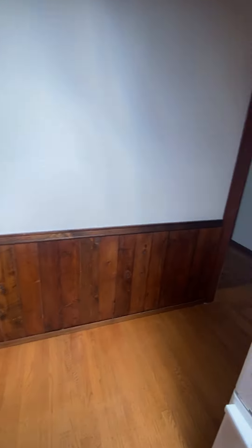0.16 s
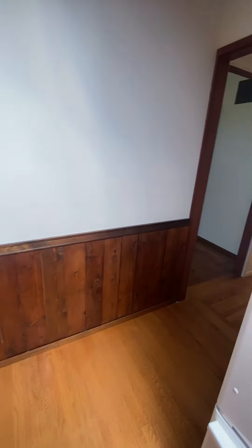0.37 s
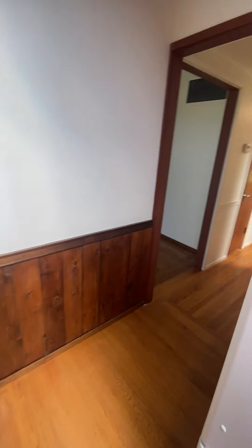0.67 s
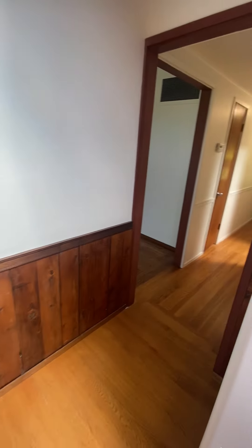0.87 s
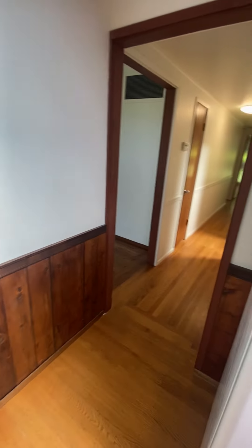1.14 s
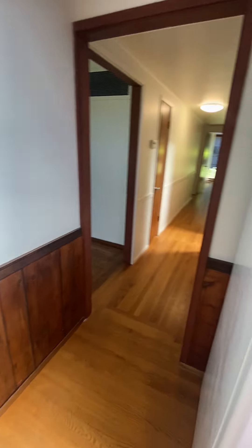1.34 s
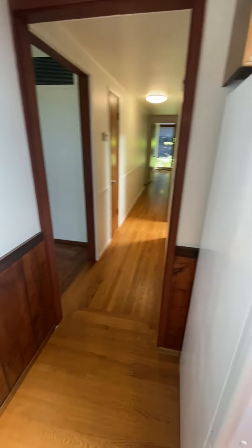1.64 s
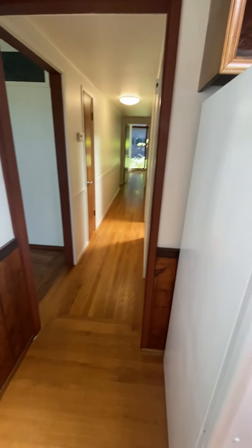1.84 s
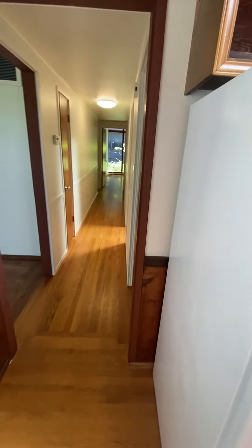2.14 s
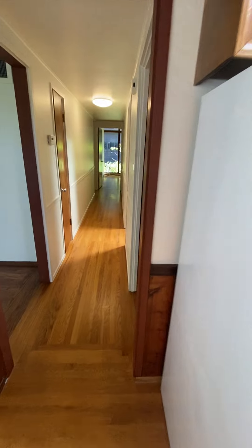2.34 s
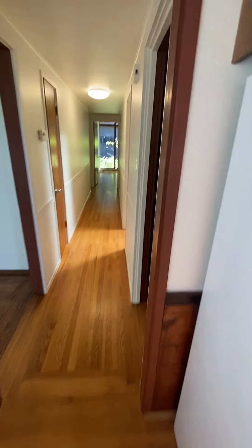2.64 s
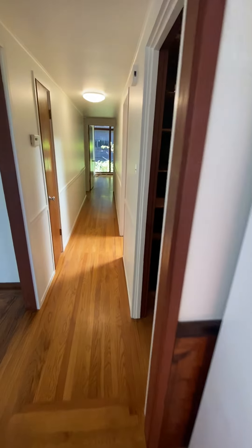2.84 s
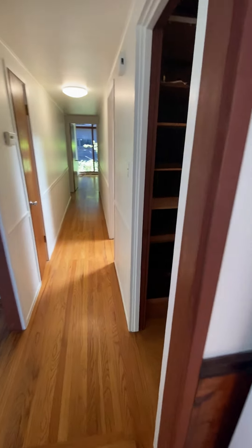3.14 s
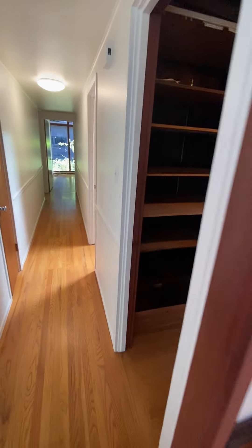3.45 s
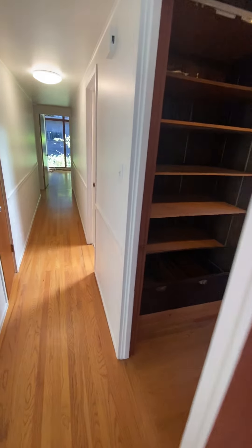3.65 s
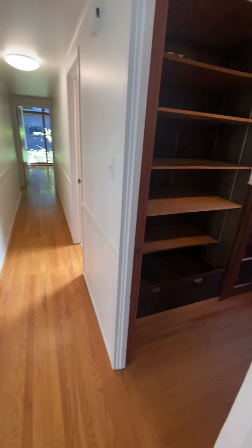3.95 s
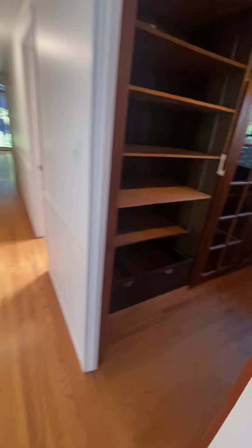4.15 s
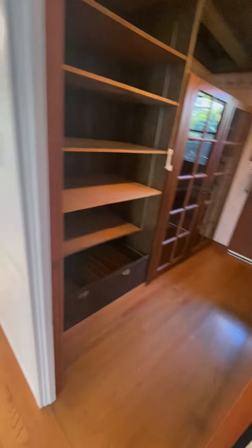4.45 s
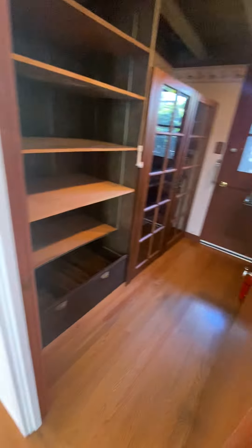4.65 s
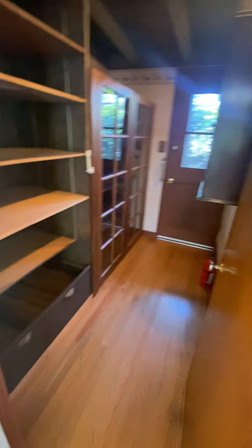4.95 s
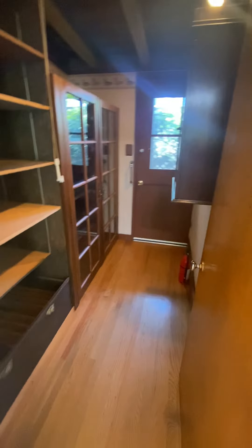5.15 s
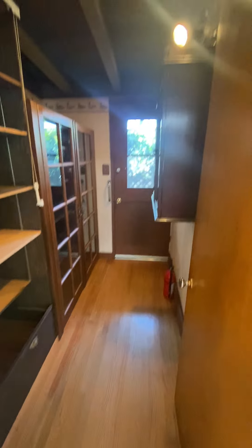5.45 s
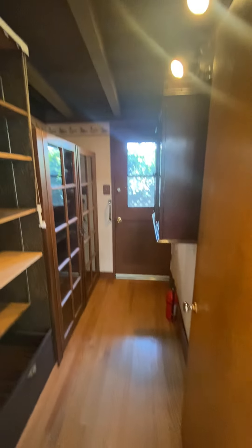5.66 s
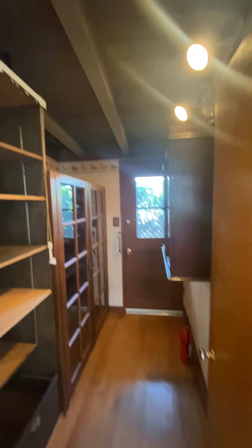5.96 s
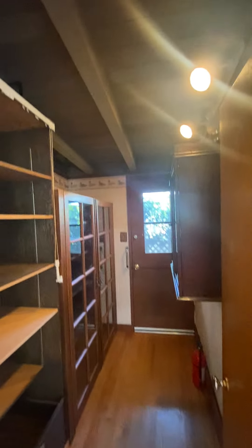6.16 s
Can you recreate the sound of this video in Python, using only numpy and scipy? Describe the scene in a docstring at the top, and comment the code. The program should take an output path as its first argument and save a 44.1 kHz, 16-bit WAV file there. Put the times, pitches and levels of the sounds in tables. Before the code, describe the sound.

A handheld phone hears someone in shoes walking through bare, echoing rooms with hardwood floors, over very faint hiss and a wavering low floor rumble. Weak, deep thumps come at 0.2 and 0.4 seconds, then the loudest step, a bright hard crack at 0.54, rings out with a flutter echo near 0.74 and a short scuff. A solid heel knock lands at 1.36, followed by a swelling, gritty, thinly whistling scrape from about 1.55 to 1.9. Softer steps and a scuff come at 2.3 to 2.7, with dry ticks close by until 3. A duller, booming heel falls at 3.2, with smaller knocks just after. Another comes near 3.97, trailed by a cluster of taps and snaps until 4.4. A fuller double knock sounds at 4.95, then light scuffing and ticks. A final firm heel and snap at 5.7 and a softer one at 5.8 die away by 6.3.

```python
"""Someone walks in shoes over a hardwood floor through bare rooms, a phone in the hand.
From the start a faint hiss and a wavering low floor tone in rumble: slowly varied noise and a sine.
From 0.2 s heels knock and drum the boards and soles snap: noise bursts and damped modes in an echoing room.
From 0.5 s soles scuff in swelling, gritty noise with thin whistles; at 0.74 s a loud crack flutters back;
from 1.3 s small things tick close by as clusters of short sines. The last heel falls at 5.8 s."""
import sys
import numpy as np
from scipy.fft import rfft, irfft, next_fast_len
from scipy.io import wavfile
from scipy.ndimage import map_coordinates

SR = 44100
rng = np.random.default_rng(int(sys.argv[2]) if len(sys.argv) > 2 else 0)


def materialize(psi):
    """Save the field psi as 16-bit PCM at rate SR to the path in sys.argv[1].

    A 1-D psi becomes a single channel; in a 2-D psi each row is a channel.
    """
    bounded = np.clip(np.atleast_2d(psi).T, -1, 1)
    quanta = np.round(bounded * 32767).astype(np.int16)
    wavfile.write(sys.argv[1], SR, quanta)


N = 278271
BLOW_SAMPLES = 2 ** 15


def amp(db):
    """Decibels to gain."""
    return 10 ** (np.asarray(db) / 20)


def unit(x):
    """Scaled to rms 1."""
    return x / np.sqrt(np.mean(x ** 2) + 1e-20)


def along(points, hz):
    """Interpolates (frequency [Hz], value) points on a log frequency axis."""
    f, v = np.transpose(points)
    return np.interp(np.log(hz + 1), np.log(f + 1), v)


def colour(*spectra):
    """Gain over frequency of (frequency [Hz], level [dB]) spectra in series."""
    return lambda hz: amp(sum(along(s, hz) for s in spectra))


def wobble(knots_per_s):
    """A smooth random curve through normally distributed knots."""
    knots = rng.standard_normal(int(N * knots_per_s / SR) + 4)
    return map_coordinates(knots, [np.arange(N) * knots_per_s / SR])


def noise_spectrum(size, gain, likeness, ripple_db=0):
    """Spectrum of stereo noise of rms 1, left-right correlation per table; ripple = the room's fine peaks."""
    hz = np.fft.rfftfreq(size, 1 / SR)
    turn = np.arccos(np.clip(along(likeness, hz), -1, 1)) / 2
    mid, side = rfft(rng.standard_normal((2, size))) * [np.cos(turn), np.sin(turn)]
    knots = rng.standard_normal(SR // 20)
    ripple = amp(ripple_db * map_coordinates(knots, [hz / 30]))  # a knot every 30 Hz
    g = gain(hz) * ripple
    return np.array([mid + side, mid - side]) * g / np.sqrt(np.mean(g ** 2))


def steady_noise(gain, likeness, ripple_db=0):
    """Steady stereo noise of a given colour."""
    size = next_fast_len(N)
    return irfft(noise_spectrum(size, gain, likeness, ripple_db), size)[:, :N]


def add(out, start_s, sound, pan_db):
    """Places a sound at a time; positive pan makes the left louder."""
    part = out[:, round(start_s * SR):][:, :sound.shape[-1]]
    part += (sound * amp([[pan_db / 2], [-pan_db / 2]]))[:, :part.shape[1]]


# hiss colour: (frequency [Hz], relative level [dB])
HISS_COLOUR = [(71, -26), (120, -7.5), (173, -17), (313, -5), (401, -20), (535, -4), (635, -18.5),
               (1050, -18.5), (1290, -23.5), (3700, -29.5), (4940, -28), (8440, -34), (11700, -46.5),
               (15200, -62), (22000, -120)]
# hiss at the two ports: (frequency [Hz], nominal left-right correlation, clipped to -1..1 [1])
HISS_LIKENESS = [(60, 0.67), (170, 0.78), (490, -1.1), (1390, -0.38), (3950, -0.43), (11200, 0.9)]


def quiet():
    """Faint stereo noise, its level slowly wandering about a mean."""
    mean_db, wander_db = -75, 0.98
    return amp(mean_db + wander_db * wobble(5.1)) * steady_noise(colour(HISS_COLOUR), HISS_LIKENESS)


# joist sway under the weight: (time [s], nominal level [dB])
SWAY_LEVEL = [(0.0, -89), (0.26, -88), (0.46, -53), (1.03, -69.5), (1.261, -65.5), (1.54, -60), (2.28, -60),
              (2.62, -57.5), (2.73, -52.5), (2.84, -62.5), (3.37, -53.5), (3.55, -53.5), (3.81, -64.5),
              (4.13, -55.5), (4.66, -67.5), (5.24, -61.5), (5.5, -70.5), (6.31, -70)]
# rumble colour: (frequency [Hz], relative level [dB])
SWAY_COLOUR = [(15, -45), (25, -19.5), (40, -1.5), (59, -1.5), (73, -3), (91, -22.5), (129, -11),
               (250, -31), (320, -59.5), (550, -120)]
# diffuse sound at the two ports, all noise but the hiss: (frequency [Hz], left-right correlation [1])
LIKENESS = [(60, 0.87), (130, 0.44), (270, 1), (570, 0.051), (1190, -0.011), (2520, -0.22), (3800, -0.43),
            (5320, 0.12), (11200, 0.028)]


def joists():
    """The floor sways as the weight shifts: a low tone, wavering in pitch and level, in rumble."""
    mean_hz = 59.3
    pitch_hz = mean_hz * (1 + 0.061 * wobble(16))
    tone = amp(4.4 * wobble(20)) * np.sin(2 * np.pi * np.cumsum(pitch_hz) / SR)
    rumble = 1.01 * steady_noise(colour(SWAY_COLOUR), LIKENESS)
    level_db = np.interp(np.arange(N) / SR, *np.transpose(SWAY_LEVEL))
    return amp(level_db) * (tone + rumble)


# bare room by octave: (centre [Hz], full ring t60 [s], build-up time constant [s])
ROOM = [(219.5, 0.62, 0.0023), (430, 0.6, 0.0038), (890, 0.59, 0.0013), (1830, 0.62, 0.00045),
        (3740, 0.76, 0.0018), (6970, 0.57, 0.0021), (11960, .3, 0.00091)]


def blow(spectrum, ring_share, direct_db):
    """Room response: bands build up and die at their own speeds, over a brief direct sound alike at both ports."""
    hz, t = np.fft.rfftfreq(BLOW_SAMPLES, 1 / SR), np.arange(BLOW_SAMPLES) / SR
    centres, t60_s, rise_s = (c[:, None] for c in np.transpose(ROOM))
    log_hz, log_centres = np.log(hz + 1), np.log(centres[:, 0])
    shares = np.array([np.interp(log_hz, log_centres, row) for row in np.eye(len(ROOM))])
    build_up = (1 - np.exp(-t / rise_s)) ** 2
    bands = irfft(shares[:, None] * spectrum, BLOW_SAMPLES) * build_up[:, None]
    direct_t60_s = 0.005 + 8 * rise_s
    direct = (bands[:, 0] * amp(direct_db - 60 * t / direct_t60_s)).sum(axis=0)
    echoes = amp(1.26 * map_coordinates(rng.standard_normal(80), [t * 70]))  # walls answer in clumps
    decay = amp(-60 * t / (ring_share * t60_s))
    return direct + echoes * (bands * decay[:, None]).sum(axis=0)


def ringing(modes, ring_share, rise_s):
    """Damped modes that swell in, at new strengths, phases and slightly new pitches for every blow."""
    t = np.arange(BLOW_SAMPLES) / SR
    total = 0
    draws = rng.standard_normal((len(modes), 3))
    for (hz, db, t60_s), (strength, detune, phase) in zip(modes, draws):
        decay = amp(db + 2.5 * strength - 60 * t / (ring_share * t60_s))
        total = total + decay * np.sin(2 * np.pi * hz * (1 + 0.026 * detune) * t + phase)
    return (1 - np.exp(-t / rise_s)) ** 2 * total


# footfalls: (time [s], overall gain [dB], nominal boom [Hz], joist boom gain [dB], panel drum gain [dB],
# knock tilt at 800 Hz [dB], knock tilt from 1.8 kHz up [dB])
HEELS = [(0.196, -68.5, 97, 22, 19, 14, 5), (0.234, -68, 62.6, 30, 21.5, -31, -8),
         (0.39, -51.5, 107.6, 9.5, 6.5, -8, 0), (0.429, -58.5, 54.3, 18, 5, -27, 6.5),
         (0.541, -32, 105, -12, -14.5, -0.5, 10), (0.81, -63.5, 50.9, 19, -0.5, -12, 10),
         (1.360, -34, 75.2, 2.5, -1.5, 0, -4), (1.529, -56.5, 56.8, 17.5, 4, -2, -26),
         (2.371, -52, 67.2, 18.5, 6.5, -15, -10), (2.486, -47, 76.3, 6.5, 3, -0.5, 4),
         (2.70, -65.5, 55.6, 31, -19, -3, 12), (3.219, -35.5, 88.7, 6.5, -9.5, -3.5, -35.5),
         (3.304, -48.5, 70.5, 20.5, 10, -9.5, -2.5), (3.348, -49.5, 65.3, 18, 10, -4, 14.5),
         (3.549, -63, 64.7, 14, -6.5, -9.5, 11), (3.771, -74.5, 65.7, 22, -4, -13, 0.5),
         (3.966, -41.5, 88.6, 2.5, -4, -3.5, -31.5), (4.048, -54.5, 78, 13.5, -5, -12, -20),
         (4.109, -54.5, 70.6, 5, 8.5, -6, 1.5), (4.193, -50, 78, 1, -12, 2.5, 17.5),
         (4.408, -50, 77, 0, -4.5, -5.5, -2), (4.930, -41, 104.7, 3, 1.5, 3, 1.5),
         (4.952, -39, 92.3, 5, -2, 7.5, -13), (5.049, -50, 69, 8.5, 2, -6, -8),
         (5.683, -36, 87, -1.5, -6, 1.5, -4.5), (5.800, -46.5, 79.5, 3, -6, 3.5, -12.5)]
# board colour: (frequency [Hz], relative level [dB])
BOARD_COLOUR = [(120, -22.5), (200, -2.5), (307, -4), (410, -4.5), (443, -3.5), (554, -4.5), (598, -3),
                (631, -3), (948, -7), (1130, -11), (1460, -15.5), (2050, -26), (2600, -41.5), (3380, -55),
                (5720, -120)]
# floor panel modes: (nominal frequency [Hz], nominal level [dB], t60 before ring share [s])
PANEL_MODES = [(126, -3.5, 0.62), (147.2, -1, 0.36), (161, 0, .35), (195.4, -8.5, 0.27)]


def heels():
    """The heel knocks the boards (noise), drums the floor panels and shakes the joists (damped modes)."""
    pan_db, ring_share = 2, 0.92
    out = np.zeros((2, N))
    for start_s, db, boom_hz, boom_db, drum_db, middle_db, edge_db in HEELS:
        tilt = [(400, 0.0018), (800, middle_db), (1100, middle_db - 3.0), (1800, edge_db)]
        knock = noise_spectrum(BLOW_SAMPLES, colour(BOARD_COLOUR, tilt), LIKENESS, ripple_db=3.0)
        boards = blow(knock, ring_share, direct_db=8.0)
        panels = amp(drum_db) * ringing(PANEL_MODES, ring_share, rise_s=0.0049)
        boom_modes = [(boom_hz, 0, 0.4), (1.3 * boom_hz, -7, 0.3)]
        beams = amp(boom_db) * ringing(boom_modes, ring_share, rise_s=0.0046)
        add(out, start_s, amp(db) * (boards + panels + beams), pan_db)
    return out


# sole and board snaps, and at 0.736 s a flutter echo of the loud crack: (time [s], overall gain [dB],
# body tilt up to 1 kHz [dB], bite tilt at 5 kHz [dB], edge tilt from 9 kHz up [dB],
# direct sound gain [dB], share of the room's ring time [1])
SNAPS = [(0.1976, -66, 13, -5, -15, 3, 0.7), (0.389, -59.5, 4, 1, -15, 7, 0.64),
         (0.539, -25.5, -8.5, 3.5, 2.2, 6, 0.75), (0.7362, -49, -2, 5, 0.5, 11, 0.81),
         (1.2076, -51.5, 6, 7.5, 13.5, -5, 0.83), (1.4318, -52.5, 9, 1, -6.5, 9.5, 0.69),
         (2.485, -55.5, -3, -6, -28, 14, 0.6), (3.2157, -54.5, 5.5, 1.5, -2.5, 13.5, 1),
         (3.3256, -44.5, 4.5, -4.5, -18, 17.5, 0.84), (3.9608, -59, 18.5, 4, -1.5, 14, 0.88),
         (4.0257, -63, -21, -2, -2.5, 15.5, .89), (4.1071, -72.5, -6, -10, -22, 23.5, 0.73),
         (4.1923, -48, 1.5, 1, 3, 14.5, 0.79), (4.4058, -67.5, 7, -4, -14, 1, 0.75),
         (4.4376, -57, 3, -6, -25, -4, 0.5), (5.6804, -52, 16, -0.8, -4, -4.5, 0.91),
         (5.7059, -42.5, 7.5, 1, -10.5, 4.5, 0.58)]
# snap colour: (frequency [Hz], relative level [dB])
SNAP_COLOUR = [(240, -31.5), (400, -4), (509, -10.5), (755, -8), (947, -14), (1060, -7.5), (1760, -11),
               (2440, -7.5), (2970, -11), (3420, -10.5), (4470, -15.5), (5230, -12.5), (9460, -22),
               (11000, -29), (11700, -83), (15200, -113), (22000, -120)]


def snaps():
    """Short hard cracks and one flutter echo: noise blows, each with its own body, bite and edge."""
    pan_db = -0.44
    out = np.zeros((2, N))
    for start_s, db, body_db, bite_db, edge_db, direct_db, ring_share in SNAPS:
        tilt = [(1000, body_db), (2200, 0.0039), (5000, bite_db), (9000, edge_db)]
        crack = noise_spectrum(BLOW_SAMPLES, colour(SNAP_COLOUR, tilt), LIKENESS, ripple_db=2.5)
        add(out, start_s, amp(db) * blow(crack, ring_share, direct_db), pan_db)
    return out


# sole slides: (start [s], swell [s], hold [s], stroke level [dB], board rub over hiss [dB],
# nominal whistle over hiss [dB], whistle pitch factor [1])
SLIDES = [(.503, 0.046, .005, -51.5, -1.5, -17.5, 1.01), (1.24, 0.015, 0.15, -65, 0.5, -12, 0.9),
          (1.43, 0.019, 0.09, -65, -3, -15, 0.74), (1.549, 0.2, 0.092, -51, -8.5, -4, 1.014),
          (1.94, 0.036, 0.075, -80.5, 3.5, -17, 1.01), (2.061, 0.05, 0.023, -64.5, 2.5, -9, 0.62),
          (2.311, 0.039, 0.019, -52, -13, -7, 1.07), (2.52, 0.069, .28, -66, -3.5, -11, 1.1),
          (2.86, 0.05, 0.28, -69.5, 0.5, -18, 1.1), (3.4, 0.021, 0.15, -71.5, 1.5, -7, 1.2),
          (3.99, 0.02, 0.046, -67.5, 2, -11.5, 1.2), (4.29, 0.056, 0.1, -70.5, 4.5, -16, 1.1),
          (4.66, 0.062, 0.062, -95, 18, -15, 1.01), (4.891, 0.069, 0.0054, -82.5, 23, -14.5, 1.01),
          (5.1, 0.083, 0.16, -76, 5, -10.5, 1.17)]
# sole on varnish: (frequency [Hz], relative level [dB])
RUB_COLOUR = [(710, -57), (1200, -10), (1670, -7.5), (1810, -7), (2550, -4), (2860, -3.5), (3690, -5.5),
              (5060, -9.5), (7470, -14), (9850, -28), (10800, -37), (11700, -50.5), (15200, -95),
              (22000, -120)]
# whistle bands: (centre before pitch factor [Hz], half-width at 1/e [Hz], relative level [dB])
WHISTLES = [(1720, 100, -8), (2772, 93, 1.8), (4270, 130, -7.5), (5120, 190, -0.5), (5590, 150, -3.5)]


def whistle_gain(pitch):
    """Gain over frequency of the thin Gaussian bands of a sliding sole."""
    return lambda f: sum(amp(db) * np.exp(-((f - pitch * hz) / width_hz) ** 2)
                         for hz, width_hz, db in WHISTLES)


def scuffs():
    """Soles drag over the varnish: a gritty hiss, a duller rub through the boards, thin whistles."""
    swell_depth_db, fade_db_per_s = 20, 116
    grains = (rng.random(N) < 40 / SR) * rng.exponential(size=N)  # 40 a second on average
    grain_decay = amp(-60 * np.arange(400) / (0.008 * SR))
    specks = np.convolve(grains, grain_decay)[:N]
    grit = amp(1.8 * wobble(24.84) + 1.2 * wobble(300)) * (1 + 0.57 * specks)  # dirt crunches
    hiss = unit(grit * steady_noise(colour(RUB_COLOUR), LIKENESS, ripple_db=4.0))
    rub = steady_noise(colour(BOARD_COLOUR), LIKENESS, ripple_db=3.0) * amp(1.4 * wobble(10))
    out, t = np.zeros((2, N)), np.arange(N) / SR
    for start_s, swell_s, hold_s, db, rub_db, whistle_db, pitch in SLIDES:
        rising = np.clip(1 - (t - start_s) / swell_s, 0, 1)
        falling_s = np.maximum(t - start_s - swell_s - hold_s, 0)
        stroke = (t > start_s) * amp(db - swell_depth_db * rising ** 2 - fade_db_per_s * falling_s)
        whistle = amp(whistle_db + 1.4 * wobble(30)) * steady_noise(whistle_gain(pitch), LIKENESS)
        out += stroke * (hiss + amp(rub_db) * rub + whistle)
    return out


# dry ticks and pocks near the phone: (time [s], level per mode [dB], nominal pitch [Hz], left over right [dB])
TICKS = [(1.272, -56, 536, 11), (1.314, -53.5, 4020, -1), (1.433, -57, 5470, -7), (2.338, -64.5, 517, 5),
         (2.6908, -71, 7000, 5), (2.7256, -60.5, 7100, -2), (2.7462, -59.5, 8540, -4),
         (2.747, -60, 2390, 2.5), (2.852, -63, 5660, 6), (2.866, -59, 518, 8), (2.9028, -66, 5330, 0.6),
         (2.924, -61, 1980, 1), (3.017, -65, 6800, 4), (3.042, -81, 5940, -4), (3.423, -57, 7170, 4),
         (3.5128, -60, 5800, -6), (4.0004, -56.5, 6650, -1), (4.026, -55, 3140, 4), (4.0751, -67, 7400, -1),
         (4.109, -59, 876, 11), (4.5226, -66, 6500, -7), (4.763, -66, 509, 14), (5.0479, -69.5, 6700, 0.6),
         (5.379, -65, 2550, -10), (5.4375, -62.5, 5580, -4.5), (5.591, -74, 443, 8)]


def ticks():
    """Each tick or pock is four damped modes a side, spread wider and dying sooner at higher pitch."""
    t60_at_1khz_s, damping_power, tail_db = 0.021, 0.43, -13.5
    out, t = np.zeros((2, N)), np.arange(SR // 4) / SR
    for start_s, db, hz, pan_db in TICKS:
        t60_s = t60_at_1khz_s * (hz / 1000) ** -damping_power
        cluster_hz = hz * (1 + (hz / 40000) * rng.standard_normal((4, 2, 1)))
        decay = amp(-60 * t / t60_s) + amp(tail_db - 60 * t / (6 * t60_s))  # plus weak afterring
        onset = (1 - np.exp(-t * 25 / t60_s)) ** 2
        modes = np.sin(2 * np.pi * cluster_hz * t).sum(axis=0)
        add(out, start_s, amp(db) * decay * onset * modes, pan_db)
    return out


def scene():
    """Quiet and sway, slightly louder on the left, under heels, snaps, scuffs and ticks."""
    background = (quiet() + joists()) * amp([[0.8], [-0.8]])
    return background + heels() + snaps() + scuffs() + ticks()


def record(dry):
    """The phone drops the deepest bass and everything above its band limit."""
    bass_corner_hz, top_hz = 44, 15800
    size = next_fast_len(N + SR // 2)
    hz = np.fft.rfftfreq(size, 1 / SR)
    response = (hz < top_hz) / (1 + (bass_corner_hz / (hz + 1)) ** 6)
    return irfft(rfft(dry, size) * response, size)[:, :N]


dry = scene()
out = record(dry)
materialize(out)
```